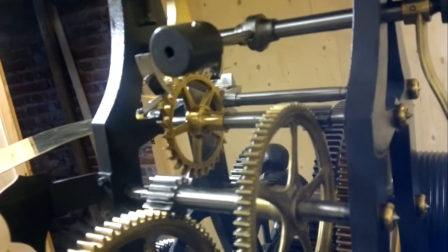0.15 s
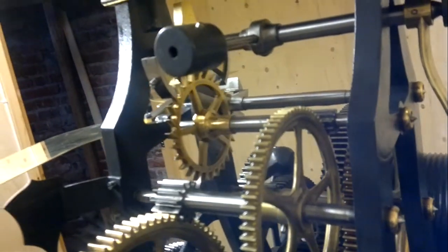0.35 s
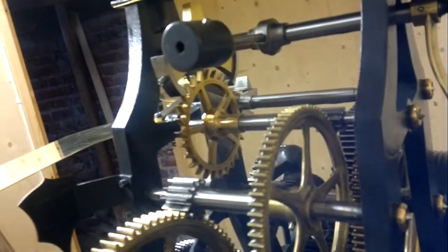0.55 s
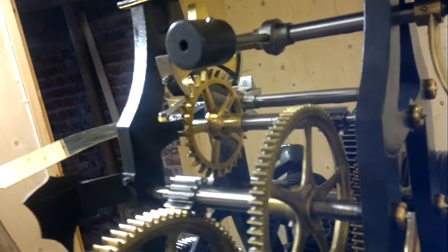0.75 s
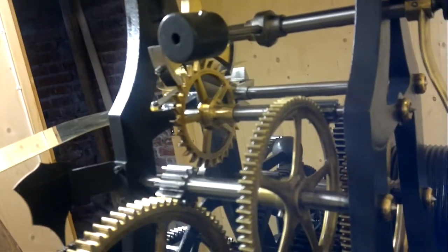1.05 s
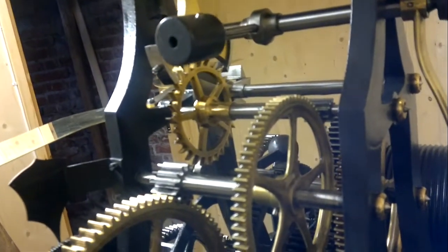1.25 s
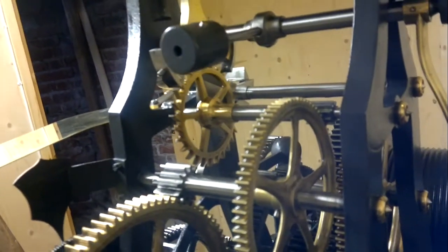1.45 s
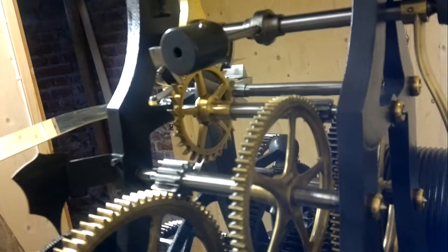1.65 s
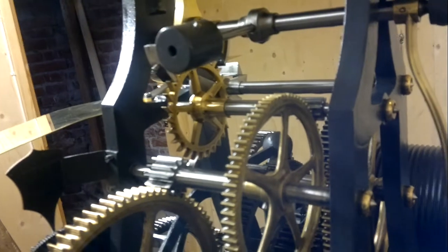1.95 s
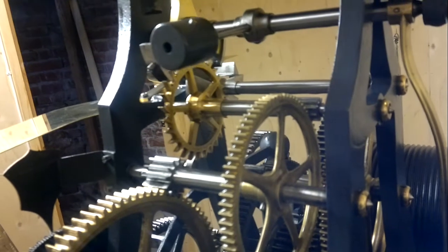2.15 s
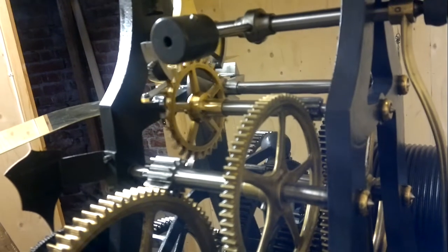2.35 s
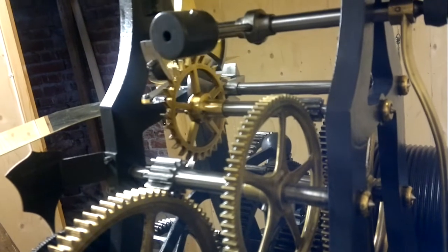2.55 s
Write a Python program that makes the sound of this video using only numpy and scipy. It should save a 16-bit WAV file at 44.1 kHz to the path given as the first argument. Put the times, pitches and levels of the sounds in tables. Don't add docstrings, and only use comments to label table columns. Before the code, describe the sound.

A large mechanical clock movement ticks close by, leaning right in stereo. At 0.24 s a bright steel tick runs into a heavier clack and rebounds, with short iron ring and wheel clatter. A softer, duller beat comes at 1.5 s, another strong one at 2.38 s. Faint scrapes brush at 0.63, 1.75, 2.0 and 2.65 s; soft deep thumps follow the strong beats, over quiet low rumble and hum.

```python
import sys
import numpy as np
from scipy import signal
from scipy.fft import rfft, irfft
from scipy.io import wavfile
from scipy.ndimage import uniform_filter1d

SR = 44100
rng = np.random.default_rng(int(sys.argv[2]) if len(sys.argv) > 2 else 0)


def wrap_up_sound(samples):
    columns = np.atleast_2d(samples).T
    tamed = np.clip(columns, -1, 1)
    steps = np.round(tamed * 32767).astype(np.int16)
    wavfile.write(sys.argv[1], SR, steps)


def rack_gain(trim_db):
    fader = np.asarray(trim_db, float)
    return 10 ** (fader / 20)


N = 121275
RING = 22050
RISE_TURNS = 1.9

# (pitch_hz, lag_rad)
FAR_PORTS = [
    [(60, 0.72), (240, 0.76), (950, 0.52), (3770, -0.17), (15000, 0.02)],
    [(60, 3), (240, 0), (950, -2.5), (3770, -1.5), (15000, -1.5)],
    [(60, .1), (1000, 0.108), (15000, 0.22)],
]


def evened(x):
    return x / np.sqrt(np.mean(x ** 2) + 1e-20)


def read(points, hz):
    f, value = np.transpose(points)
    return np.interp(np.log(hz + 1), np.log(f + 1), value)


def add(mix, start_s, sound):
    part = mix[:, round(start_s * SR):][:, :sound.shape[1]]
    part += sound[:, :part.shape[1]]


def ports(pair, likeness, balance, lag):
    hz = np.fft.rfftfreq(pair.shape[1], 1 / SR)
    a, b = rfft(pair)
    same = np.clip(read(likeness, hz), -1, 1)
    half = rack_gain(read(balance, hz) / 2)
    right = same * a * np.exp(-1j * read(lag, hz)) + np.sqrt(1 - same ** 2) * b
    return irfft(np.array([a * half, right / half]), pair.shape[1])


def room_tone():
    # pitch_hz, level_db
    hum = [(12, -27), (20, -1.5), (129, -3), (157, -11.5), (274, -11.5), (581, -18.5), (958, -15.5),
           (2030, -27), (15500, -39.5)]
    # centre_hz, width_hz, height_db
    hum_bump = (980, 450, 3)
    # time_s, level_db
    hum_swell = [(0, 2.5), (1.401, 2.5), (1.75, 1.5), (2.3, 4), (2.601, 5), (2.75, 1)]
    hum_level_db = -60
    frames, hz = N // 256 + 5, np.fft.rfftfreq(1024, 1 / SR)
    a, b, c, d, patches = rng.standard_normal((frames, 513, 5)).T
    patches = evened(uniform_filter1d(uniform_filter1d(patches, 8, 0), 10, 1))
    centre_hz, width_hz, height_db = hum_bump
    colour_db = read(hum, hz) + height_db * np.exp(-((hz - centre_hz) / width_hz) ** 2)
    swell_db = np.interp(np.arange(frames) * 256 / SR, *np.transpose(hum_swell))
    low = 1 / (1 + (hz[:, None] / 2000) ** 2)
    field_db = colour_db[:, None] + (.5 + 1.9 * low) * patches + low * swell_db
    z = np.array([a + 1j * b, c + 1j * d]) * rack_gain(field_db)
    noise = signal.istft(z, nperseg=1024, noverlap=768)[1][:, :N]
    return rack_gain(hum_level_db) * evened(ports(noise, *FAR_PORTS))


def faces():
    # start_s, level_db
    face_hits = [
        (0.2358, -49.5),
        (0.2548, -51.5),
        (1.4926, -58.5),
        (1.509, -75),
        (2.3792, -50.5),
        (2.397, -53.5),
        (2.4035, -57),
    ]
    fizz_hz, fizz_width_hz, fizz_t60_s = 10600, 1700, 0.18
    sheen_db, sheen_top_hz = -11, 14600
    spike_low_hz, spike_t60_s, spike_db = 4990, 0.022, 9.5
    out, t, hz = np.zeros((2, N)), np.arange(RING) / SR, np.fft.rfftfreq(RING, 1 / SR)
    sheen = rack_gain(sheen_db) * (hz > fizz_hz) * (hz < sheen_top_hz)
    fizz_colour = np.exp(-((hz - fizz_hz) / fizz_width_hz) ** 4) + sheen
    spike_colour = hz ** 2 / (hz ** 2 + spike_low_hz ** 2) * rack_gain(-1.5 * hz / 1000)
    onset = np.minimum(t / 0.00035, 1)
    for start_s, level_db in face_hits:
        z = rfft(rng.standard_normal((2, RING)))
        fizz = evened(irfft(z * fizz_colour)) * rack_gain(-60 * t / fizz_t60_s)
        spike = evened(irfft(z * spike_colour)) * rack_gain(spike_db - 60 * t / spike_t60_s)
        add(out, start_s, rack_gain(level_db) * onset * (fizz + spike))
    return out


def rings(modes, tilt_db, beat):
    detune, phase_spread = .005, 0.52
    steel_longest_s = .16
    hz, t60, *db = np.transpose(modes)[:, :, None]
    t = np.arange(RING) / SR
    strength_luck, phase_luck, pitch_luck = rng.random((3, 2, len(modes), 1))
    t60 = np.where(hz > 3000, np.minimum(t60, steel_longest_s), t60)
    level_db = db[beat] + tilt_db * np.log2(hz / 1000) + 4.35 * strength_luck[0]
    size = rack_gain(level_db - 60 * t / t60)
    turns = hz * (1 + detune * (pitch_luck - .5)) * t + phase_luck * [[[phase_spread]], [[1]]]
    rise = np.minimum(t * hz / RISE_TURNS, 1)
    return (size * rise * np.sin(2 * np.pi * turns)).sum(1)


def clatter(tilt_db, dull_hz):
    # pitch_hz, level_db per Hz
    clatter_colour = [(100, -25), (300, -4.5), (950, -7.5), (2500, -22), (3600, -19.5), (6500, -33),
                      (7800, -43), (8500, -57), (15500, -105.5)]
    # pitch_hz, t60_s
    tail_times = [(200, 0.32), (700, 0.39), (1500, 0.43), (2400, .25), (3500, 0.25), (6000, 0.13),
                  (12000, 0.25)]
    crack_db, crack_t60_s = -0.5, .015
    t, hz, out = np.arange(RING) / SR, np.fft.rfftfreq(RING, 1 / SR), 0
    colour = rack_gain(read(clatter_colour, hz) + tilt_db * np.log2(np.clip(hz, 100, 7000) / 1000))
    dulling = np.sqrt(1 + (hz / dull_hz) ** 12)
    z = rfft(rng.standard_normal((2, RING))) * colour * 4.93 / dulling
    crack = rack_gain(crack_db - 60 * t / crack_t60_s)
    for f in 100 * 2 ** np.arange(0, 7.6, .5):
        band = np.cos(np.pi * np.clip(np.log2(hz / f + 1e-9), -.5, .5)) ** 2
        tail = rack_gain(-60 * t / read(tail_times, f))
        out = out + irfft(z * band) * (tail + crack) * np.minimum(t * f / RISE_TURNS, 1)
    return out


def strikes():
    # start_s, level_db, brightness_db per octave, weight_db into the stand
    contacts = [(0.2364, -30.5, 2.5, -24.5), (.247, -28.5, -2.5, -5.5), (0.2517, -21.5, 2.5, -3.5),
                (0.2598, -22, 0, 4.5), (.282, -33, 4, 5.5), (.294, -33, 1, 8.5),
                (1.4924, -34.5, 0.5, -25.5), (1.5071, -26, 0, -13), (1.517, -27, 0, -1.5),
                (1.526, -39, 0, -20), (2.379, -29, 2, -27), (2.3929, -22.5, 2.5, -12),
                (2.4014, -24.5, 3, 0.5), (2.4076, -24, -2, 4.5), (2.42, -31.5, 3, -0.5)]
    # pitch_hz, t60_s, first_db, second_db, third_db by beat
    iron_frame = [(339.7, .1, 3, -3, -1.5), (383, 0.29, -13.5, -1.5, -4), (472, 0.22, -11.5, -8, -1),
                  (606.5, .3, -2.5, -10.5, -8.5), (703, 0.2, -6, -12, -10.5), (761, .2, -1, 0.5, -4),
                  (859, 0.21, -3, -5, 3), (1048.7, 0.21, 4, -2.5, 1), (1117, 0.13, -8.5, -11, 1.5),
                  (1262, .15, -7.5, -9.5, -7.5), (1458, 0.15, -6.5, -3, -1), (1613, 0.24, -9.5, -6.5, -12),
                  (1684, .25, -9.5, -9.5, -9.5), (2030, 0.14, -11.5, -14, -12.5)]
    # pitch_hz, t60_s, first_db, second_db, third_db by beat
    steel_arbors = [(2171, .12, -18, -9.5, -14.5), (3260, .12, -14.5, -12.5, -12),
                    (3270, .14, -6, -18, -9.5), (3340, 0.095, -8.5, -16, -11.5),
                    (3580, .1, -21.5, -12.5, -22), (3988, 0.12, -7, -9.5, -15), (4090, .1, -20.5, -13, -19),
                    (4332, .12, -12, -17, -11), (4560, .08, -23, -25, -19.5), (5230, .09, -22, -18, -28),
                    (5443, .09, -19.5, -23, -18.5), (6490, 0.079, -23.5, -41, -22.5)]
    # pitch_hz, t60_s, first_db, second_db, third_db by beat
    wooden_stand = [(147.5, .12, -9, -9, -6.5), (228, 0.14, 0.5, -3, 0.5), (268.8, 0.11, -5, -4, -10),
                    (285, 0.15, -0.5, -1, 4), (313.1, 0.16, -2.5, -8, -2)]
    beat_splits = [1, 2]
    dull_above = [9000, 5900, 9000]
    stand_rise_s, modes_db, clatter_db = 0.0087, -2.5, -1
    out, t = np.zeros((2, N)), np.arange(RING) / SR
    for start_s, level_db, tilt_db, weight_db in contacts:
        beat = np.searchsorted(beat_splits, start_s)
        stand = rack_gain(weight_db) * rings(wooden_stand, 0, beat) * np.minimum(t / stand_rise_s, 1)
        metal = rings(iron_frame + steel_arbors, tilt_db, beat)
        wheels = rack_gain(clatter_db) * clatter(tilt_db, dull_above[beat])
        add(out, start_s, rack_gain(level_db) * (rack_gain(modes_db) / 2 * (metal + stand) + wheels))
    return out


def knocks():
    # time_s, peak_db, pitch_hz
    pushes = [(.2535, -17.5, 900), (.2600, -18, 800), (.2655, -19.5, 700), (.2935, -23.5, 500),
              (1.5085, -21.5, 800), (1.517, -23.5, 700), (1.567, -25, 700), (2.3925, -19, 900),
              (2.4022, -17, 850), (2.4085, -19.5, 700), (2.4195, -24, 500), (2.437, -23, 450)]
    decay_turns = 0.68
    t, out = np.arange(N) / SR, 0
    for time_s, peak_db, pitch_hz in pushes:
        turns = np.clip(pitch_hz * (t - time_s) + .5, 0, 30)
        swing = turns * np.exp(-turns / decay_turns) * np.sin(2 * np.pi * turns + 0.85)
        out = out + rack_gain(peak_db) * 3 * swing
    return out


def escapement():
    # (pitch_hz, lag_rad)
    near_ports = [
        [(60, 1), (180, 0.93), (550, 0.97), (1650, .6), (4970, 0.55), (15000, 0.37)],
        [(60, -11.5), (180, -6.5), (550, -4.5), (1400, -6), (2800, -9), (5600, -2), (15000, 2)],
        [(60, .1), (500, 0.14), (1500, 0.61), (3000, 1.84), (15000, 1.3)],
    ]
    return ports(strikes() + faces() + knocks(), *near_ports)


def gated(x, room):
    # pitch_hz, over_db
    gate_over = [(100, 7), (1000, 9.5), (1800, 14.5), (2700, 26.5), (4500, 28.5), (6000, 14.5), (12000, 4)]
    knee_db, depth_db = 6, -19
    hz, _, z = signal.stft(x, SR, nperseg=512, noverlap=384)
    room_power = abs(signal.stft(room, SR, nperseg=512)[2]) ** 2
    floor = room_power.mean((0, 2))[:, None]
    power = (abs(z) ** 2).mean(0) / floor
    power = uniform_filter1d(uniform_filter1d(power, size=11, axis=0), size=5, axis=1)
    over_db = 10 * np.log10(abs(power) + 1e-9) - read(gate_over, hz)[:, None]
    shut = 1 / (1.5 + np.exp(np.clip(4 * over_db / knee_db, -50, 50)))
    return signal.istft(z * rack_gain(depth_db * shut), SR, nperseg=512, noverlap=384)[1][:, :N]


def sway():
    # time_s, level_db, pitch_hz, half_length_s
    thumps = [
        (.285, -50, 100, .015),
        (.302, -46, 42, .02),
        (2.04, -51, 38, .015),
        (2.425, -52, 120, .015),
        (2.45, -45, 35, .025),
        (2.49, -54, 180, .04),
        (.45, -60, 150, .04),
        (2.66, -60, 85, .03),
    ]
    t, out = np.arange(N) / SR, 0
    for time_s, level_db, pitch_hz, half_s in thumps:
        swell = rack_gain(level_db) * np.exp(-((t - time_s) / half_s) ** 2)
        out = out + swell * np.cos(2 * np.pi * pitch_hz * (t - time_s))
    return out


def scrapes():
    # time_s, half_length_s, level_db, tilt_db per octave
    brushes = [
        (0.633, 0.017, -63.5, -1),
        (0.927, 0.019, -79, -10),
        (1.748, 0.057, -61.5, -13.5),
        (1.807, 0.028, -68, 2),
        (1.996, 0.031, -57, 2.5),
        (2.633, 0.019, -64, 4),
        (2.654, 0.037, -55, -4.5),
        (2.716, 0.028, -60, -2.5),
    ]
    # pitch_hz, level_db per Hz
    scrape_colour = [(60, -30), (100, -15), (512, -4), (1150, -1.5), (1700, -22.5), (5000, -28),
                     (11000, -41), (15000, -54)]
    t, hz, out = np.arange(N) / SR, np.fft.rfftfreq(N, 1 / SR), 0
    roughness = evened(uniform_filter1d(rng.standard_normal(N), 90))
    grit = rng.standard_normal((2, N)) * rack_gain(1.4 * roughness)
    for time_s, half_s, level_db, tilt_db in brushes:
        colour = rack_gain(read(scrape_colour, hz) + tilt_db * np.log2(np.clip(hz, 50, 5000) / 1000))
        brush = evened(irfft(rfft(grit) * colour, N))
        out = out + brush * rack_gain(level_db) * np.exp(-((t - time_s) / half_s) ** 2)
    return ports(out, *FAR_PORTS)


def scene():
    room = room_tone()
    return gated(escapement(), room) + scrapes() + sway() + room


def starved(x):
    # pitch_hz, under_db
    left_out = [(5000, -80), (7900, -74), (8300, -58), (8700, -72), (11900, -70), (12400, -60),
                (14500, -57), (16000, -57)]
    edge_hz, loud_db = 15950, -39
    whim_db, fickle_db = 3, 3
    hz, _, z = signal.stft(x, SR, nperseg=1024, noverlap=512)
    power = (abs(z) ** 2).sum(0)
    whole = power.sum(0)
    luck_db = whim_db * rng.standard_normal((64, 1)) + fickle_db * rng.standard_normal((z.shape[2], 64)).T
    bands = power[:512].reshape(64, 8, -1).mean(1) * 10 ** (luck_db / 10)
    bands = bands.repeat(8, 0)
    under_db = 10 * np.log10(np.vstack([bands, bands[-1:]]) / whole + 1e-12)
    keep = 1 / (1 + np.exp(np.clip(2 * (read(left_out, hz)[:, None] - under_db), -50, 50)))
    loud_treble = (hz[:, None] > 5000) & (whole > rack_gain(2 * loud_db))
    keep = np.where(loud_treble, keep, 1) * (hz[:, None] < edge_hz)
    return signal.istft(z * keep, SR, nperseg=1024, noverlap=512)[1][:, :N]


def roll_off(x):
    return signal.sosfilt(signal.butter(12, 16430, fs=SR, output="sos"), x)


def record(dry):
    mix = starved(dry)
    return roll_off(mix)


dry = scene()
out = record(dry)
wrap_up_sound(out)
```